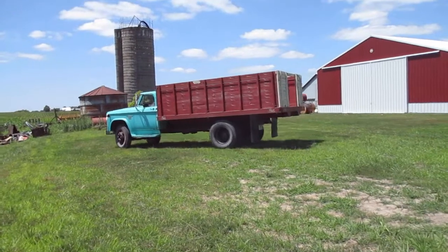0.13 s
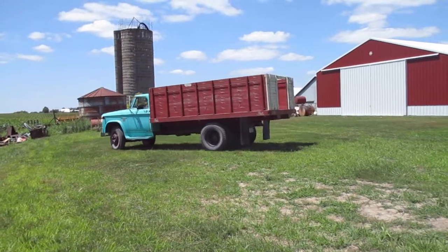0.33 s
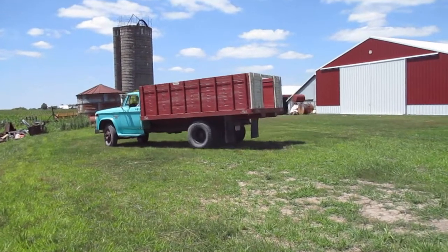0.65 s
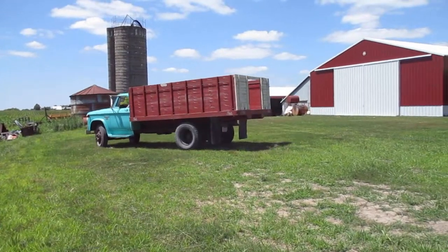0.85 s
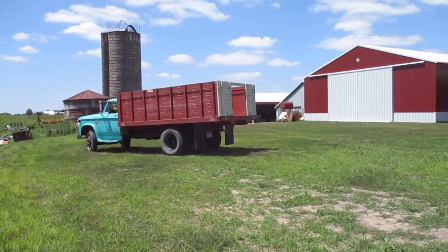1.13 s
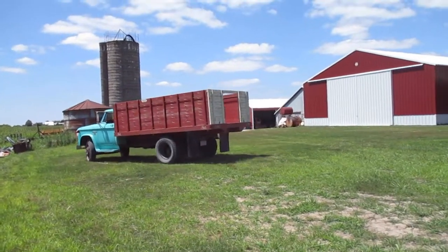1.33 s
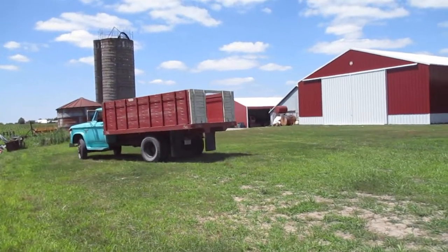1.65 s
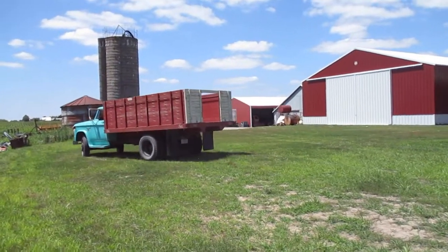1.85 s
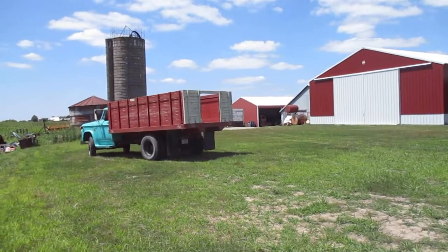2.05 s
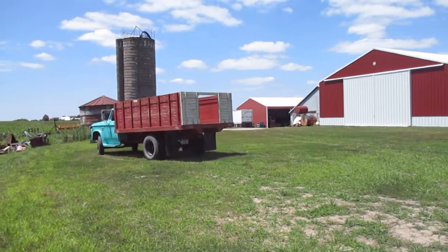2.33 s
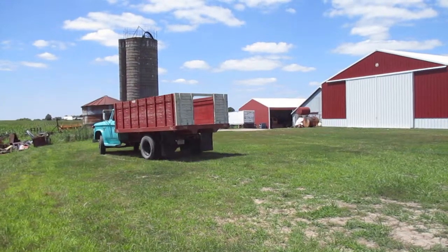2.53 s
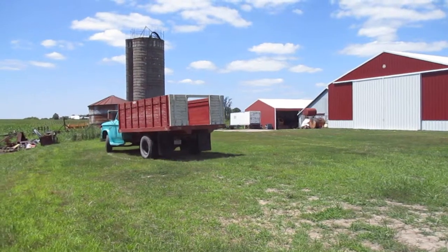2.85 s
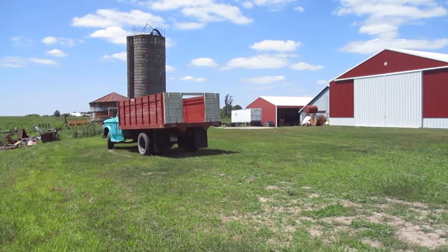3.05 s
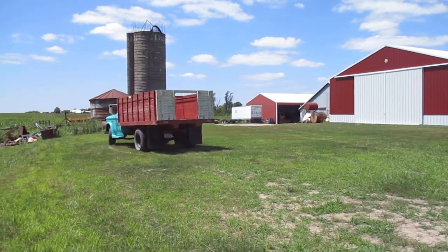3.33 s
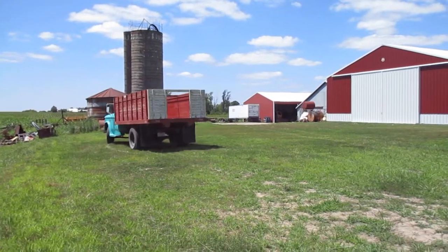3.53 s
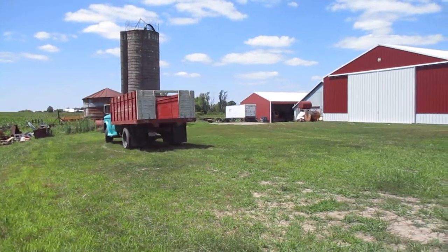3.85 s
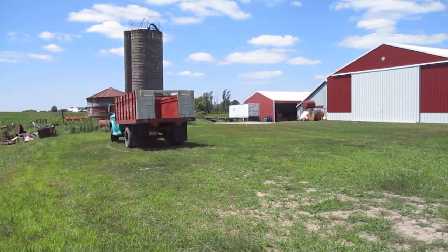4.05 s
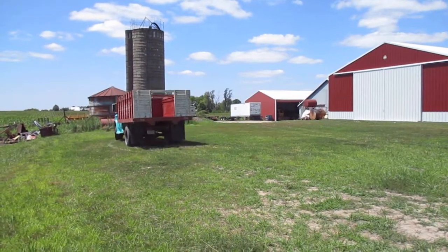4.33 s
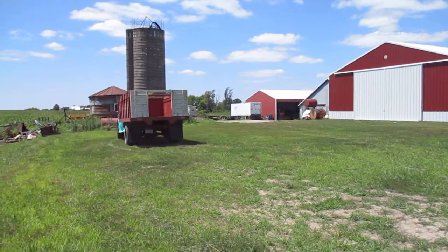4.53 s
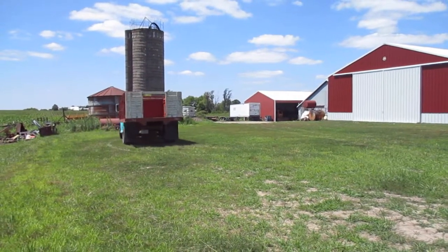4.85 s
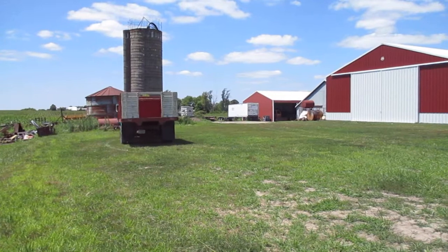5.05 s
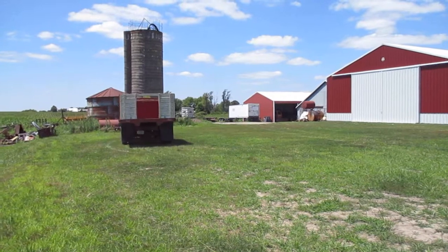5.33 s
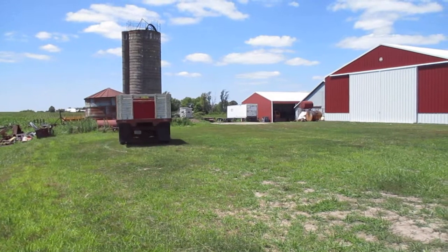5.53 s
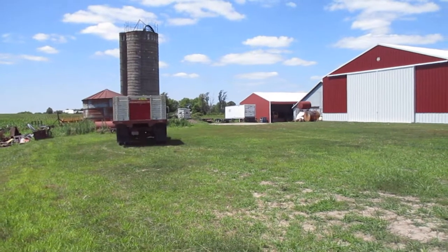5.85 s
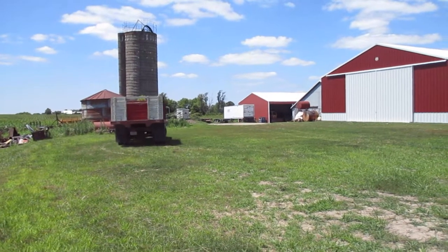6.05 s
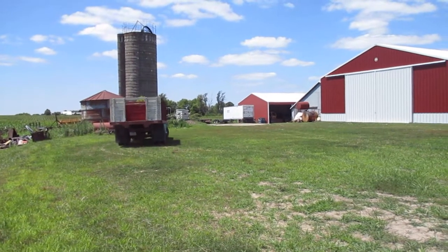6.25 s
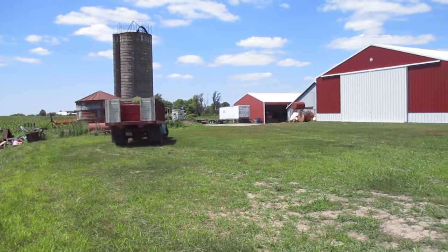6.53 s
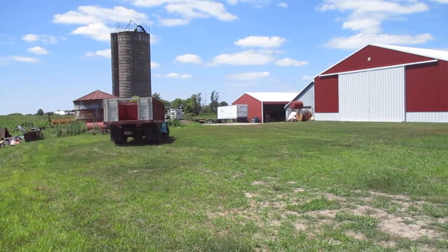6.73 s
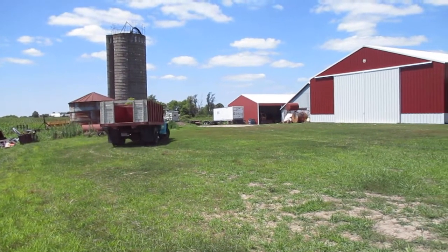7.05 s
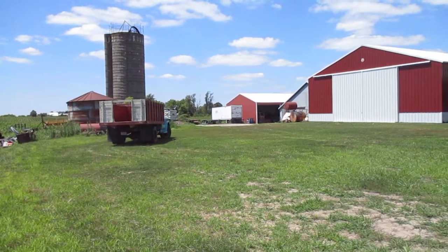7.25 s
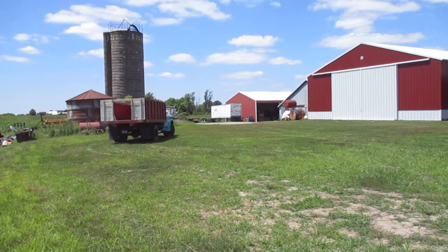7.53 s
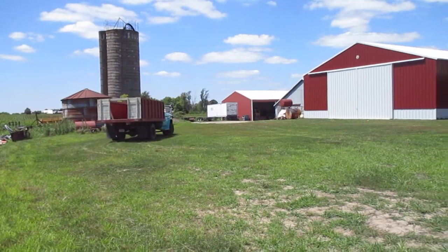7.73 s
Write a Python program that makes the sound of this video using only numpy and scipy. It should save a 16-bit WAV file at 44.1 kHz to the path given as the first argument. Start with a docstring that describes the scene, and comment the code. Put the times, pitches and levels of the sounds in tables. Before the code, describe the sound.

An old eight-cylinder petrol truck crawls over an open grassy farmyard for about eight seconds. From 0 s its low, uneven exhaust burble runs almost steadily, around a hundred firings a second, with bright valve ticking, sheet-metal rattle and airy fan hiss. The clatter recedes over the first four seconds while the hollow tailpipe throb comes forward, its speed hunting slightly from 2 to 6 s. Rattle swells over bumps near 4.1, 5.3 and 7.4 s; small metallic knocks are scattered throughout. Two very high crickets chirp in short rows. Dry close clicks snap between 1.1 and 2.9 s, and a small bird whistles at 3.5 s and faintly around 7 s. Wind buffets the microphone from 4.4 to 7.1 s, with heavy thumps near 5.7 and 6.15 s briefly ducking everything. The truck is weakest near 6.5 s, then returns slightly. A barely audible, very high electronic tone persists.

```python
"""An old eight-cylinder petrol truck crawls away over a grassy yard and turns, its exhaust burbling unevenly.
Uneven firing pulses ring its pipe; valve ticks, rattle and knocks ring engine block and panel modes.
Two crickets chirp in rows of tone bursts, a small bird whistles glides, dry clicks snap near the microphone.
Gusts of lumpy low noise buffet the microphone, and the strongest thumps pull the recorder's gain down.
A faint steady electronic tone lies under it all."""
import sys
import numpy as np
from scipy import signal
from scipy.io import wavfile

SR = 44100
rng = np.random.default_rng(int(sys.argv[2]) if len(sys.argv) > 2 else 0)


def store_wav(level_fs):
    """Save 16-bit WAV to argv[1]."""
    pcm = np.round(np.clip(np.atleast_2d(level_fs), -1, 1) * 32767)
    wavfile.write(sys.argv[1], SR, pcm.T.astype(np.int16))


def convert_level_to_amplitude(level_db):
    """Map a level in decibels to its linear amplitude factor."""
    exponent = np.asarray(level_db, float) / 20
    return 10 ** exponent


N = 348369


def rms_one(x):
    """Scale to rms 1."""
    return x / np.sqrt(np.mean(x ** 2) + 1e-20)


def in_time(rows):
    """Columns of a curve, the first being t/s, at every sample."""
    t, *columns = np.transpose(rows)
    return [np.interp(np.arange(N) / SR, t, column) for column in columns]


def drift(corner_hz):
    """Slow random wander of rms 1: noise through two equal low-pass poles."""
    coarse = 40   # samples per step of the wander
    r = np.exp(-2 * np.pi * corner_hz * coarse / SR)
    noise = rng.standard_normal(N // coarse + 2002)
    slow = signal.lfilter([1], [1, -2 * r, r * r], noise)[2000:]   # settled part only
    return np.interp(np.arange(N) / coarse, np.arange(len(slow)), rms_one(slow))


def impulses(seconds, sizes):
    """Single spikes at given times, each shared between the two nearest samples."""
    at = np.asarray(seconds) * SR
    out = np.full(N + 1, 1e-18)   # tiny floor keeps later filters fast
    keep = (at >= 0) & (at < N - 1)
    whole, part = at[keep].astype(int), at[keep] % 1
    sizes = np.asarray(sizes)[keep]
    np.add.at(out, whole, sizes * (1 - part))
    np.add.at(out, whole + 1, sizes * part)
    return out[:N]


def resonance(x, hz, width_hz):
    """Two-pole band-pass, gain 1 on top."""
    r = np.exp(-np.pi * width_hz / SR)
    turn = 2 * np.pi * hz / SR
    return signal.lfilter([(1 - r * r) / 2, 0, (r * r - 1) / 2], [1, -2 * r * np.cos(turn), r * r], x)


def band(x, low_hz, high_hz, order=2):
    """Butterworth band-pass."""
    return signal.sosfilt(signal.butter(order, [low_hz, high_hz], "band", fs=SR, output="sos"), x)


def banded_noise(spectrum, patchy_db):
    """Noise in bands of about a third of an octave, each flickering on its own; rms 1."""
    hz, level_db = np.transpose(spectrum)
    low_hz, high_hz = hz[0], min(hz[-1], 16000)
    edges = np.geomspace(low_hz, high_hz, round(3 * np.log2(hz[-1] / low_hz)) + 1)
    white = rng.standard_normal((2, N))   # neighbouring bands take turns
    out = 0
    for k, (low, high) in enumerate(zip(edges, edges[1:])):
        centre_db = np.interp(np.log(low * high) / 2, np.log(hz), level_db)
        out = out + convert_level_to_amplitude(centre_db + patchy_db * drift(22)) * band(white[k % 2], low, high)
    return rms_one(out)


# engine speed set by the driver's foot: t/s, speed/(full firing cycles per s)
FOOT_SPEED = [(0, 12.972), (.2, 12.628), (.6, 12.773), (1, 12.6), (1.6, 12.845), (2.2, 13.048),
              (2.9, 12.795), (4, 12.842), (6, 12.777), (7.3, 12.594), (7.9, 12.807)]
# hunting around that speed under load: t/s, depth/(cycles per s)
HUNTING_DEPTH = [(1.8, 0), (2.4, .242), (5.4, .169), (6.8, 0)]


def engine_cycles():
    """Cycles turned so far: the set speed with the hunting on top, summed over time."""
    swings_per_s, crest_s, quickening = 1.11, 4.046, .046   # quickening: swings per s, gained each second
    t = np.arange(N) / SR - crest_s
    swings = (swings_per_s + quickening * t / 2) * t
    hunting = in_time(HUNTING_DEPTH)[0] * np.cos(2 * np.pi * swings)
    return np.cumsum(in_time(FOOT_SPEED)[0] + hunting) / SR


def moments(cycles, shares):
    """Times at which the engine passes given shares of its cycle; one row a cycle, -1 when outside."""
    wanted = np.arange(-8, cycles[-1] + 1)[:, None] + shares
    return np.interp(wanted, cycles, np.arange(N) / SR, left=-1, right=-1)


# what reaches the microphone as the truck turns and draws off:
# t/s, tailpipe level/dB, engine bay level/dB
TRUCK_AT_MICROPHONE = [(0, -2.5, 10), (.5, -1, 7.5), (1.5, 2, 4), (2.5, 1.5, 2.5), (3.5, 1, 0.8),
                       (4.2, 1.5, -1), (5, 1, -4.5), (5.6, -0.5, -7), (6, -4, -8.5), (6.5, -7.5, -13),
                       (7, -3.5, -7.5), (7.4, -4.5, -4), (7.9, -2, -3.5)]


def level_at_microphone(base_db, pipe_share, bay_share):
    """A layer's level in dB: its base and its shares of the tailpipe's and the engine bay's swing."""
    pipe_db, bay_db = in_time(TRUCK_AT_MICROPHONE)
    return base_db + pipe_share * pipe_db + bay_share * bay_db


# cylinders in firing order, the two banks having pipes of unequal length: strength/dB, arrival lag/ms
FIRING_ORDER = [(0.4, 1.99), (2.5, -1.99), (-5.0, -2.78), (3.5, 2.57), (2.1, -2.22), (3.5, 2.4),
                (1.2, 1.57), (3.7, -1.54)]
# the silencer's boom, then three tailpipe modes: f/Hz, width/Hz, level/dB
PIPE_MODES = [(62.9, 8.0, -34.9), (183.1, 16.0, -12.0), (188.5, 19.6, -13.3), (154.2, 57.2, -37.0)]
# weak overtones of the exhaust: f/Hz, width/Hz, level/dB
PIPE_OVERTONES = [(231.5, 71.6, -48), (276.6, 13.7, -46), (427.8, 15.3, -49.5), (615.6, 22.2, -53),
                  (1029, 40, -64.5)]
# spectrum of the gas roar: f/Hz, relative level/dB per Hz
ROAR_SPECTRUM = [(150, -32), (250, 0.5), (313, -4.5), (421, -7), (634, -15), (823, -17.5), (1030, -18),
                 (2000, -27), (2600, -71), (4400, -120)]


def exhaust(cycles):
    """One pressure pulse per firing rings the silencer and the pipe; gas roar puffs along."""
    strength_db, lag_ms = np.transpose(FIRING_ORDER)
    first_firing = .0711   # share of a cycle
    at = moments(cycles, first_firing + np.arange(8) / 8)
    late, strong = rng.standard_normal((2,) + at.shape)
    at = at + (lag_ms + .06 * late) / 1000   # firings come a little unevenly
    pulses = impulses(at, convert_level_to_amplitude(strength_db + .55 * strong)) * SR / 25.6   # each order near height 1
    soft = np.exp(-.5 * (np.arange(-99, 100) / (.0005 * SR)) ** 2)   # a pulse lasts about a millisecond
    rounded = np.convolve(pulses, soft / soft.sum(), "same")

    boom, *pipe = [convert_level_to_amplitude(db) * resonance(rounded, hz, width) for hz, width, db in PIPE_MODES]
    throb = pipe[1] - pipe[0] - pipe[2]   # neighbouring modes swing in opposition

    upper = 0
    for hz, width, db in PIPE_OVERTONES:
        tone = resonance(resonance(pulses, hz, width), hz, 3 * width)
        upper = upper + convert_level_to_amplitude(db + 1.2 * drift(0.36)) * tone   # its strength wanders slowly at random

    puffs = signal.lfilter([1], [1, -np.exp(-1 / (0.00083 * SR))], pulses)   # 0.83 ms decay
    roar = rms_one((1 + 0.14 * rms_one(puffs)) * banded_noise(ROAR_SPECTRUM, patchy_db=1.5))

    out = convert_level_to_amplitude(level_at_microphone(-0.6, 0.19, 0.45)) * boom
    out = out + convert_level_to_amplitude(level_at_microphone(0, 1, 0)) * throb
    out = out + convert_level_to_amplitude(level_at_microphone(-34.5, 0.056, 0.62)) * roar
    return out + convert_level_to_amplitude(level_at_microphone(-3.26, .6, 0.13)) * upper


def intake(cycles):
    """All cylinders draw air evenly through one throat: a hum at the firing rate."""
    gulp = .118   # share of a cycle at which a gulp peaks
    wavering_db = -28 + 1.5 * drift(3)
    return convert_level_to_amplitude(wavering_db) * np.cos(2 * np.pi * 8 * (cycles - gulp))


# engine block and panel modes: f/Hz, level/dB, t60/s
BLOCK_MODES = [(1965, -6.5, 0.078), (2377, 5, 0.03), (2535, -3.5, 0.075), (2783, -0.5, 0.056),
               (3072, 6, 0.018), (4166, -4, 0.036), (4560, -9, 0.053), (5770, -8, 0.021),
               (6270, -16.5, 0.026), (7030, -15, 0.027), (8160, -15.5, 0.032)]


def struck_block(seconds, level_db, scatter_db):
    """Every blow strikes each block and panel mode with a strength and sign of its own."""
    seconds, level_db = np.ravel(seconds), np.ravel(level_db)
    chance = rng.standard_normal((len(seconds), len(BLOCK_MODES), 2))
    out = 0
    for k, (hz, mode_db, t60) in enumerate(BLOCK_MODES):
        sign = np.sign(chance[:, k, 1])
        sizes = convert_level_to_amplitude(level_db + mode_db + scatter_db * chance[:, k, 0]) * sign
        width_hz = np.log(1000) / (np.pi * t60)
        wander = convert_level_to_amplitude(2.5 * drift(3))   # each mode's ringing swells and fades at random, on its own
        ringing = resonance(impulses(seconds, sizes), hz, width_hz) * SR / (np.pi * width_hz)
        out = out + wander * ringing
    return out


# valve gear contacts in each cycle: share of cycle, level/dB
VALVE_CONTACTS = [(.14, 0), (.27, -8), (.4, -6), (.53, -10), (.65, -9), (.78, -11), (.89, -5)]
# how far the ticks stand out of the rattle: t/s, level/dB
TICK_PROMINENCE = [(3.4, -7), (4.4, 0)]


def valve_ticks(cycles):
    """Valve gear contacts strike the block at fixed points of each cycle."""
    share, valve_db = np.transpose(VALVE_CONTACTS)
    at = moments(cycles, share)
    ticks = rms_one(struck_block(at, valve_db + 0 * at, scatter_db=2.5))
    ticks = ticks + convert_level_to_amplitude(9) * band(ticks, 5000, 9000)   # hard steel contacts are bright
    return ticks * convert_level_to_amplitude(in_time(TICK_PROMINENCE)[0])


# where the body rattles harder over bumps in the yard: middle t/s, length/s, level/dB
YARD_BUMPS = [(0.03, 1, 2.5), (4.09, 1.2, 6), (5.296, 0.91, 6), (7.44, 0.69, 6.5)]


def bumps():
    """Extra rattle in dB, swelling and fading over each bump."""
    t = np.arange(N) / SR
    extra_db = 0
    for middle, length, db in YARD_BUMPS:
        extra_db = extra_db + db * np.cos(np.pi * np.clip((t - middle) / length, -.5, .5)) ** 2
    return extra_db


def rattle():
    """Sheet metal rattles as a dense random shower of blows, harder over bumps."""
    blows = 5000
    seconds = rng.uniform(0, N / SR, blows)
    blow_db = 1.9 * np.minimum(rng.exponential(1, blows), 3)
    return convert_level_to_amplitude(-1 + bumps()) * rms_one(struck_block(seconds, blow_db, scatter_db=2.5))


# spectrum of the fan hiss: f/Hz, relative level/dB per Hz
HISS_SPECTRUM = [(1060, -32), (1800, -15), (2360, 3.5), (3800, -0.5), (4120, -13.5), (5030, 4),
                 (5860, -6.5), (8480, -11.5), (9700, -6), (10700, -17), (15500, -23)]


def fan_hiss(cycles):
    """Flickering air noise of the fan that swells with each valve tick."""
    share, valve_db = np.transpose(VALVE_CONTACTS)
    at = moments(cycles, share)
    decay = np.exp(-1 / (0.013 * SR))   # 13 ms
    swell = signal.lfilter([1], [1, -decay], impulses(at, convert_level_to_amplitude(valve_db + 0 * at)))
    return rms_one((1 + 1.1 * swell) * banded_noise(HISS_SPECTRUM, patchy_db=.7))


# gusts on the microphone: start t/s, end t/s, level/dB
MICROPHONE_GUSTS = [(4.39, 5.05, -21.5), (5.45, 6.104, -20.5), (6.39, 7.103, -24)]


def gusts():
    """Wind pressure in time: a breeze, and gusts that rise, hold and drop."""
    breeze_db, edge_s = -38, 0.082
    t = np.arange(N) / SR
    pressure = convert_level_to_amplitude(breeze_db)
    for start, end, db in MICROPHONE_GUSTS:
        inside = np.clip(np.minimum(t - start, end - t) / edge_s + .5, 0, 1)
        pressure = pressure + convert_level_to_amplitude(db) * inside ** 2
    return pressure


# strong wind thumps on the microphone: t/s, level/dB, push 1 or pull -1
WIND_THUMPS = [(4.6144, -11, 1), (4.6799, -12, 1), (4.713, -10.5, -1), (4.7732, -13, 1), (4.938, -20, 1),
               (5.3098, -7, 1), (5.5499, -5.5, 1), (5.6227, -11, -1), (5.698, -18, 1), (5.7338, 1, 1),
               (5.8337, -12, 1), (5.905, -14, 1), (6.027, -6.5, 1), (6.06, -10, 1), (6.1486, 3.5, 1),
               (6.4282, -4.5, -1), (6.483, -12.5, 1), (6.675, -14, 1), (6.7925, -5, -1)]


def wind():
    """Lumpy low noise, and single eddies that shove the membrane for about one swing."""
    lump_db = 4.0 * np.minimum(drift(22), 1.8)
    lumps = band(rng.standard_normal(N) * convert_level_to_amplitude(lump_db), 45, 175, order=3)
    pressure = gusts()

    eddies_per_s, eddy_db = 13, 8.5   # small thumps, their spread above the wind's level
    eddies = (rng.random(N) < eddies_per_s / SR) * rng.standard_normal(N)
    eddies = eddies * pressure * convert_level_to_amplitude(eddy_db)
    s, thump_db, sense = np.transpose(WIND_THUMPS)
    thumps = impulses(s, np.sign(sense) * convert_level_to_amplitude(thump_db))

    thump_hz, thump_s = 170.0, .0021
    t = np.arange(-600, 601) / SR
    envelope = np.exp(-.5 * ((t + .0004) / thump_s) ** 2)   # leads the middle crest by 0.4 ms
    swing = np.cos(2 * np.pi * thump_hz * t) * envelope
    shoves = signal.fftconvolve(thumps + eddies, swing - swing.mean(), "same")
    return pressure * rms_one(lumps) + shoves


def electronic_whine():
    """A faint electronic tone, one steady sine."""
    return convert_level_to_amplitude(-75) * np.sin(2 * np.pi * 11793 * np.arange(N) / SR)


def cricket(bouts, hz, strokes_per_s, count):
    """A chirp is a short row of wing strokes, each a soft burst of slightly wavering tone."""
    s = np.concatenate([np.linspace(first, last, round(many)) for first, last, many, _ in bouts])
    level_db = np.concatenate([np.full(round(many), db) for _, _, many, db in bouts])
    chance = rng.standard_normal((len(s), 2))
    s = s + .006 * chance[:, 0]
    level_db = level_db + 1.0 * chance[:, 1]
    order = np.arange(count) - (count - 1) / 2
    at = s[:, None] + order / strokes_per_s
    sizes = convert_level_to_amplitude(level_db[:, None] + 11.0 + 1.8 * rng.standard_normal(at.shape))
    stroke = np.hanning(round(.0055 * SR))
    shape = np.convolve(impulses(at, sizes), stroke, "same")
    wavering_hz = hz * (1 + 0.0091 * drift(44))
    return shape * np.sin(2 * np.pi * np.cumsum(wavering_hz) / SR)


# bouts of near evenly spaced chirps, one table a cricket: first t/s, last t/s, chirps, relative level/dB
HIGH_CRICKET_BOUTS = [(.02, .63, 6, -59.5), (1.143, 1.737, 6, -62), (2.178, 2.68, 5, -62),
                      (3.314, 3.603, 3, -65), (3.76, 3.968, 3, -64), (4.387, 4.846, 5, -61),
                      (4.99, 5.105, 2, -56), (5.487, 6.088, 6, -60.5), (6.55, 7.262, 7, -64),
                      (7.699, 7.811, 2, -64)]
LOW_CRICKET_BOUTS = [(.11, .635, 4, -59), (.849, 3.211, 14, -61), (3.413, 5.68, 13, -59),
                     (5.88, 7.222, 8, -65), (7.387, 7.757, 3, -61)]


def crickets():
    """Two crickets, the higher one with the faster wing strokes."""
    high = cricket(HIGH_CRICKET_BOUTS, 9880, strokes_per_s=150.0, count=7)
    return high + cricket(LOW_CRICKET_BOUTS, 9640, strokes_per_s=130.0, count=7)


# louder single ticks and knocks on the truck: t/s, relative level/dB
STRONG_KNOCKS = [(0.1647, -33), (0.3247, -33), (1.8148, -36), (1.8991, -30.5), (2.585, -33), (3.8377, -32),
                 (3.9535, -33), (5.1587, -34), (5.2, -37), (5.222, -34), (5.248, -50), (5.6301, -30.5),
                 (5.7082, -32.5), (6.332, -44), (6.493, -43), (6.6483, -35), (7.123, -31), (7.578, -33),
                 (7.835, -35)]


def knocks():
    """Louder single ticks and knocks, each one blow on the block and panel modes."""
    s, knock_db = np.transpose(STRONG_KNOCKS)
    return struck_block(s, knock_db - 14, scatter_db=2.0)


# dry clicks near the microphone: t/s, relative level/dB, middle band above treble/dB
NEAR_CLICKS = [(1.1222, -33, -7), (2.162, -29.5, -7), (2.4155, -26.5, -14), (2.419, -29.5, -19),
               (2.671, -31.5, -4), (2.9014, -22, -5.5), (2.9026, -27.5, 0.5), (2.9047, -30, -8),
               (2.927, -33, -20), (5.559, -44.5, 10), (7.12, -43, -8)]


def clicks():
    """Each snap is a bright spike with a duller share of its own."""
    s, click_db, middle_db = np.transpose(NEAR_CLICKS)
    bright = band(impulses(s, convert_level_to_amplitude(click_db + 16)), 8000, 15500)
    dull = band(impulses(s, convert_level_to_amplitude(click_db + middle_db + 24.0)), 3500, 10000)
    return bright + dull


# bird notes: start t/s, length/s, from f/Hz, to f/Hz, relative level/dB
BIRD_NOTES = [(3.498, 0.022, 3600, 3700, -46), (3.518, 0.022, 3280, 3630, -42),
              (3.538, 0.02, 3020, 2930, -47), (6.845, 0.053, 3520, 3850, -62),
              (7.048, .052, 3480, 3830, -51), (7.192, 0.054, 3470, 3670, -51),
              (7.356, 0.047, 3540, 3700, -52)]


def bird():
    """Short whistles, each gliding evenly from one pitch to another."""
    out = np.zeros(N)
    for start, length, from_hz, to_hz, level_db in BIRD_NOTES:
        size, i = round(length * SR), round(start * SR)
        tone = np.sin(2 * np.pi * np.cumsum(np.linspace(from_hz, to_hz, size)) / SR)
        out[i:i + size] += convert_level_to_amplitude(level_db + 7) * np.hanning(size) * tone
    return out


def scene():
    """The truck in the yard, the animals, the clicks and the wind, at one microphone."""
    cycles = engine_cycles()
    clatter = convert_level_to_amplitude(level_at_microphone(-47, .05, 0.66)) * (valve_ticks(cycles) + rattle())
    hiss = convert_level_to_amplitude(level_at_microphone(-46.5, 0.044, 0.41)) * fan_hiss(cycles)
    truck = exhaust(cycles) + intake(cycles) + clatter + hiss + knocks()
    return (truck + wind() + electronic_whine() + crickets() + clicks() + bird())[None]


def low_pass(x):
    """Removes everything above the highest recorded frequency."""
    return signal.sosfilt(signal.butter(12, 15820, fs=SR, output="sos"), x)


def record(dry):
    """Peaks over the limit pull the gain down and it creeps back; what is too fast for it clips."""
    limit_db, slope = -4.0, 1.05   # slope: dB of cut per dB over the limit
    release_db_per_s, attack_s = 45.0, .007
    heard = signal.sosfilt(signal.butter(4, 15000, fs=SR, output="sos"), dry)
    over_db = slope * np.maximum(20 * np.log10(abs(heard[0]) + 1e-9) - limit_db, 0)
    ramp = release_db_per_s * np.arange(N) / SR
    held_db = np.maximum.accumulate(over_db + ramp) - ramp   # falls back at the release rate
    r = np.exp(-1 / (attack_s * SR))
    cut_db = signal.lfilter([1 - r], [1, -r], held_db)
    mix = np.clip(heard * convert_level_to_amplitude(-cut_db), -1, 1)
    return low_pass(mix)


dry = scene()
out = record(dry)
store_wav(out)
```